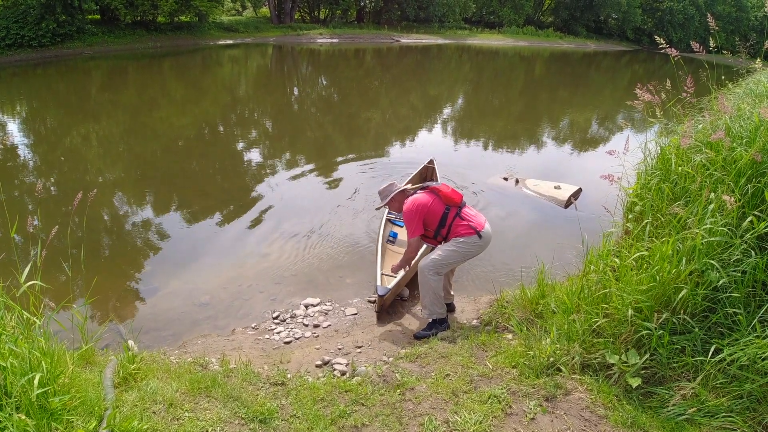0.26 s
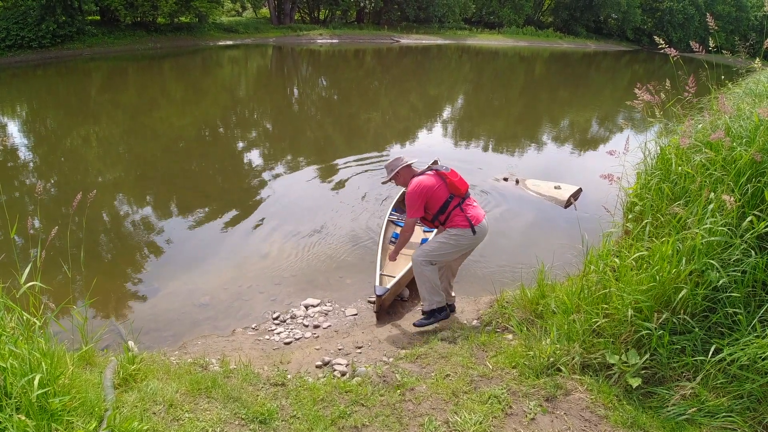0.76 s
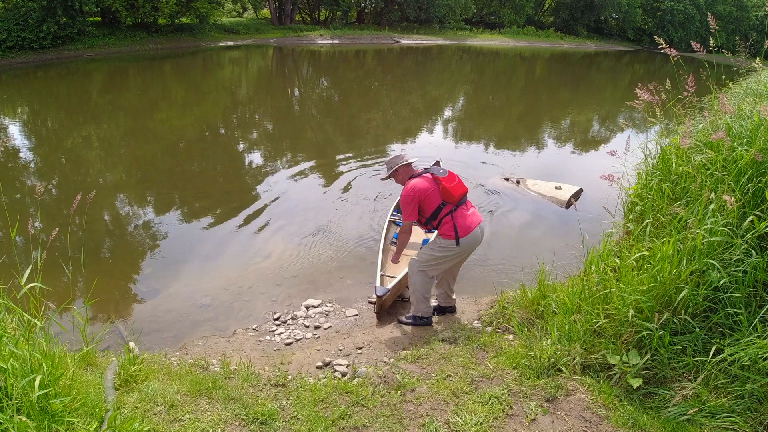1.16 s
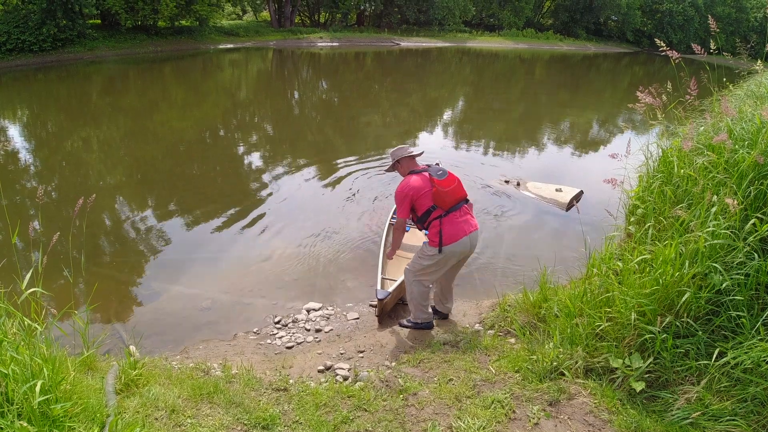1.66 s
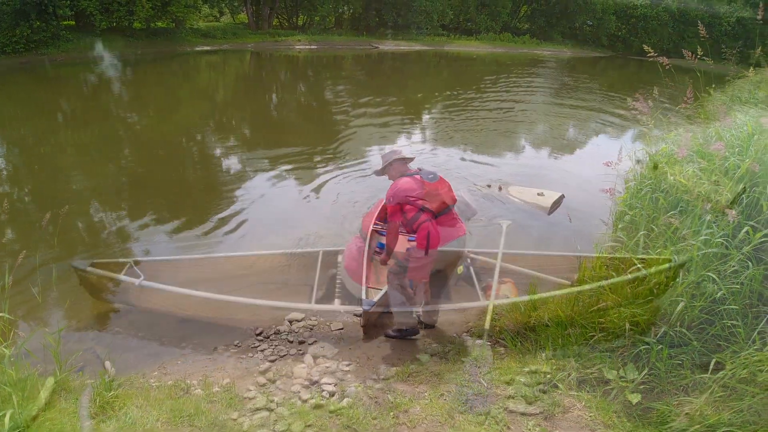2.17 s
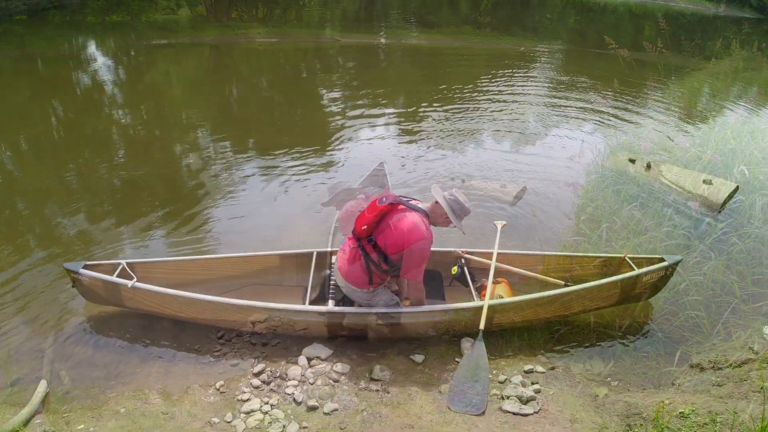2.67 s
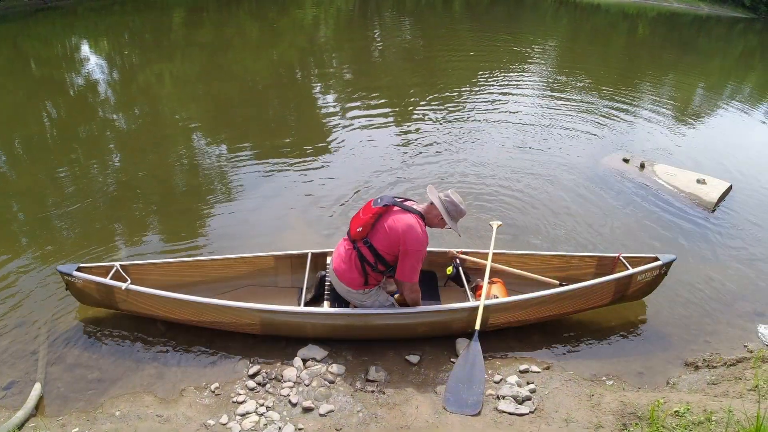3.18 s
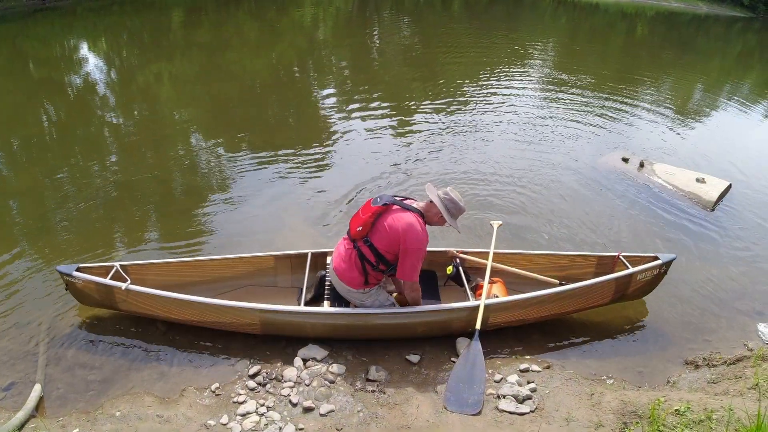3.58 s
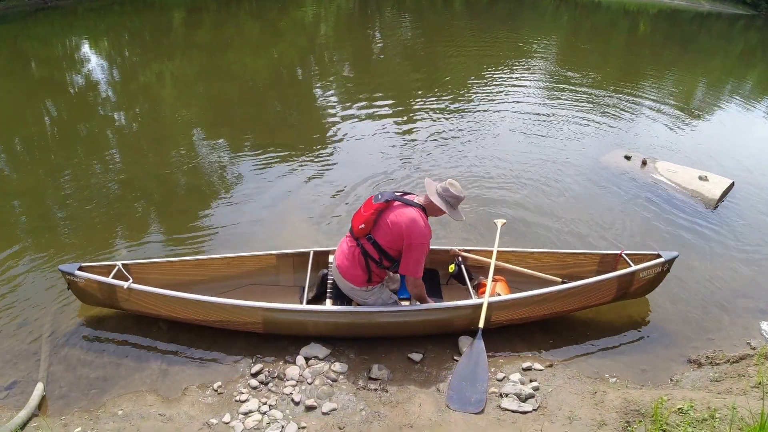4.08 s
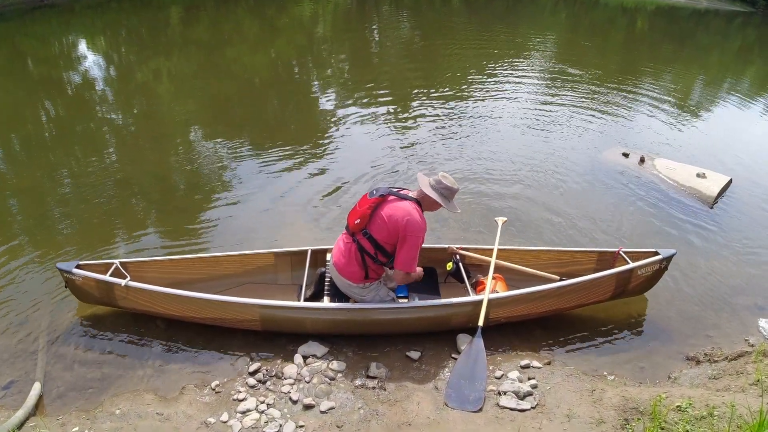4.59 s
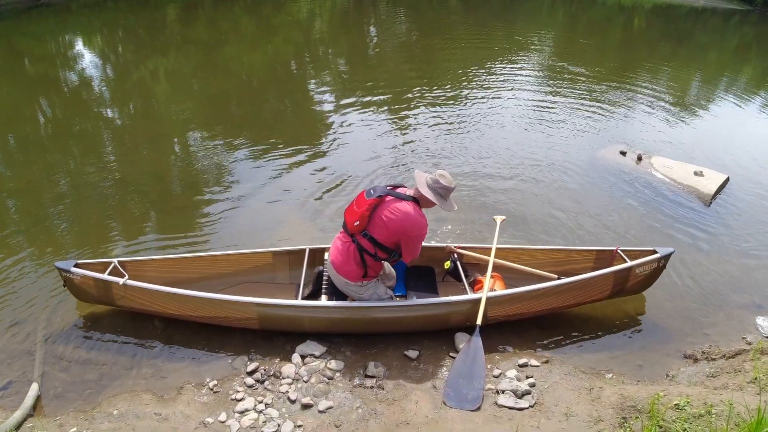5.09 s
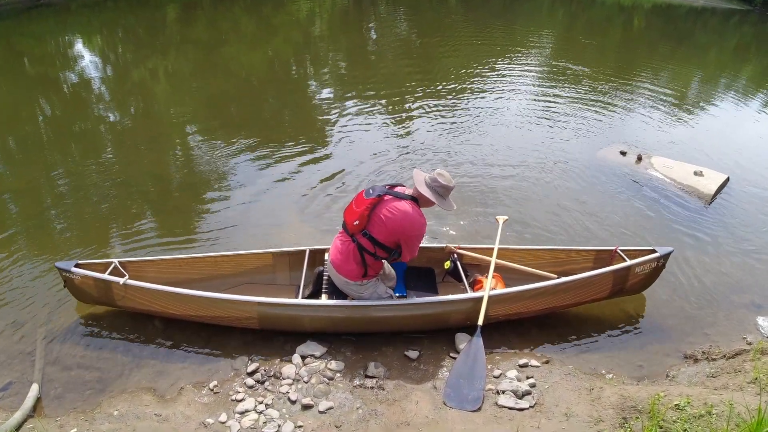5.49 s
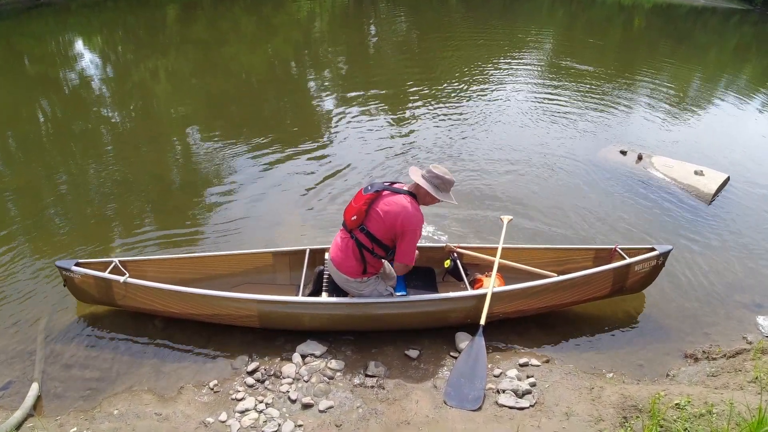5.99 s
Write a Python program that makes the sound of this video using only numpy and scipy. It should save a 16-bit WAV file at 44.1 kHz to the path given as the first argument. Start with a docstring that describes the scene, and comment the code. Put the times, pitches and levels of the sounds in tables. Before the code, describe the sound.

Open-air hush with a faint low engine drone at a riverbank, in wide stereo. A tiny scuff at 0.35 s, then from 0.9 to 2.6 s a far bird warbles short slurred notes, blurred by trees. A light hull knock lands at 1.1 s, a duller thump with a low boom at 1.7 s. Between 1.9 and 3.3 s the background swells into a louder rumbling hush, with soft scuffs and a very faint high hiss. A nearer sparrow whistles at 2.9 and 3.3 s, buzzes at 3.5, rasps from 3.6, then trills six even syllables from 3.9 to 4.6, ending on a sinking whistle. A deep hull boom at 4.2 s. From 4.63 to 4.8 s gear clatters in the hollow canoe, with the heaviest bang about 4.97 s. A buzzy chirp at 5.2 s; watery plops, drips and spray from 5.66 to 5.92 s.

```python
"""A paddler settles into a canoe at a riverbank: noise scuffs, and knocks that ring the hollow hull's modes.
Water plops follow: rising bubble tones with splashes, drips and spray.
A far bird warbles in slurred sines; a nearer sparrow sings whistles, buzzes, a rasp and a trill, with noise-
cloud echoes. Shaped noise gives open-air hush, wavering sines an engine drone; the bank's background fades
into the louder shore's. A separate faint high hiss rises partway through."""
import sys
import numpy as np
from scipy import signal
from scipy.fft import rfft, irfft
from scipy.io import wavfile

SR = 44100
rng = np.random.default_rng(int(sys.argv[2]) if len(sys.argv) > 2 else 0)


def generate_wav(signal):
    """Clip the signal to [-1, 1] and save it as 16-bit WAV at the path in sys.argv[1]."""
    frames = np.transpose(np.atleast_2d(signal))
    scaled = np.clip(frames, -1, 1) * 32767
    pcm = np.round(scaled).astype(np.int16)
    wavfile.write(sys.argv[1], SR, pcm)


N = 275625
TIME = np.arange(N) / SR


def from_db(db):
    """Decibels to gain."""
    return 10 ** (np.asarray(db) / 20)


def rms_one(x):
    """Scale to unit power."""
    return x / np.sqrt(np.mean(x ** 2) + 1e-20)


def at_hz(points, hz):
    """Read a table on a log-frequency axis."""
    f, value = np.transpose(points)
    return np.interp(np.log(hz + 1e-3), np.log(f), value)


def add(out, start_s, sound):
    """Mix a sound in at its start time."""
    i = max(0, int(start_s * SR))
    out[i:i + len(sound)] += sound[:max(0, N - i)]


def bins(x):
    """Frequencies of a sound's spectrum."""
    return np.fft.rfftfreq(x.shape[-1], 1 / SR)


def filtered(x, gain):
    """Apply a gain to each spectral bin."""
    return irfft(rfft(x) * gain, x.shape[-1])


def colour(x, spectrum):
    """Give steady noise a spectrum; rms 1."""
    return rms_one(filtered(x, from_db(at_hz(spectrum, bins(x)))))


def hump(hz, centre_hz, octaves):
    """A bell on the log-frequency axis."""
    return np.exp(-.5 * (np.log2((hz + 1e-3) / centre_hz) / octaves) ** 2)


def cut(x, hz, kind):
    """Fourth-order low- or high-pass."""
    return signal.sosfilt(signal.butter(4, hz, kind, fs=SR, output="sos"), x)


def grains(size, uneven_db):
    """Dense micro-contacts of uneven strength."""
    return rng.standard_normal(size) * from_db(uneven_db * np.minimum(rng.exponential(1, size), 5))


def wander(length, per_s):
    """Random values joined by straight lines, one for each sample."""
    steps = np.arange(length) * per_s / SR
    points = rng.standard_normal(1000)
    return np.interp(steps, np.arange(len(points)), points)


def scatter(x, wet_db, t60_s, delay_s):
    """Reflections off bank and trees: a dying cloud of echoes."""
    t = np.arange(SR) / SR
    cloud = rng.standard_normal(SR) * (t > delay_s) * from_db(-60 * t / t60_s)
    return from_db(wet_db) * signal.fftconvolve(x, cloud / np.linalg.norm(cloud))[:N]


def surround(x, wet_db, t60_s, delay_s):
    """Echoes from all sides: above the bass each ear gets its own."""
    mid, side = scatter(x, wet_db, t60_s, delay_s), scatter(x, wet_db, t60_s, delay_s)
    return (mid + cut(side, 830, "high") * [[1], [-1]]) / np.sqrt(2)


def place(x, phase):
    """Turn the two ears against each other by a bearing's phase."""
    return filtered(x, np.exp(.5j * at_hz(phase, bins(x)) * [[1], [-1]]))


# left-right correlation of the air: (frequency [Hz], correlation [-1..1])
LIKENESS = [(25, 0.79), (70, 1), (300, 0.97), (600, 0.92), (1100, 0.67), (2200, -0.14), (4000, -0.085),
            (8000, 0.6), (14000, 0.66)]


def diffuse(spectrum):
    """Stereo noise from all around, its left-right correlation set by frequency."""
    mid, side = rfft(rng.standard_normal((2, N)))
    alike = np.clip(at_hz(LIKENESS, bins(TIME)), -.99, .995)
    ears = np.sqrt(1 + alike) * mid + np.sqrt(1 - alike) * side * [[1], [-1]]
    return colour(irfft(ears, N), spectrum)


def drone(lines):
    """Low engine lines that waver in strength and phase: sines plus narrow noise skirts."""
    out = 0
    for hz, db, unsteady in lines:
        skirt = rms_one(filtered(rng.standard_normal(N), 1 / (1 + ((bins(TIME) - hz) / 4) ** 2)))
        tone = np.sqrt(2) * np.sin(2 * np.pi * (hz * TIME + rng.random()))
        out = out + from_db(db) * rms_one(tone + unsteady * skirt)
    return out


# hush and hiss spectra: (frequency [Hz], relative density [dB per Hz])
BANK_AIR_SPECTRUM = [(12, -54), (20, -23.5), (43, -6), (127, -10), (156, -12), (227, -16.5), (330, -19.5),
                     (413, -23), (699, -23.5), (812, -24), (1150, -28), (1410, -31), (2320, -33.5),
                     (3220, -34.5), (7920, -58.5), (10300, -61.5), (17400, -120)]
SHORE_AIR_SPECTRUM = [(20, -3), (40, 5), (65, -6), (100, 0), (150, -4.5), (280, -13.5), (500, -19.5),
                      (1000, -19), (2000, -28), (3500, -29.5), (5500, -43.5), (8500, -52.5), (16000, -86)]
HISS_SPECTRUM = [(3000, -3), (9000, -1.5), (13000, 4.5), (16000, -4.5)]
# engine lines: (frequency [Hz], level over the hush [dB], skirt-to-tone ratio [rms])
BANK_DRONE_LINES = [(50.7, -2.5, 0.19), (87.7, -7.5, 1), (130.6, -7, 1)]
SHORE_DRONE_LINES = [(71.4, -5, 0.41), (91.8, -4, 1.24), (272.6, -22, 1.4)]
SHIFT_START_S, SHIFT_END_S = 1.9, 3.29
BANK_HUSH_DB, SHORE_HUSH_DB = -59, -50
HISS_START_DB, HISS_END_DB = -93.5, -84


def air():
    """Open-air hush and engine drone fade from bank to shore; a separate faint high hiss rises."""
    shift = np.clip((TIME - SHIFT_START_S) / (SHIFT_END_S - SHIFT_START_S), 0, 1)
    bank = from_db(BANK_HUSH_DB) * (diffuse(BANK_AIR_SPECTRUM) + drone(BANK_DRONE_LINES))
    shore = from_db(SHORE_HUSH_DB) * (diffuse(SHORE_AIR_SPECTRUM) + drone(SHORE_DRONE_LINES))
    hiss_db = HISS_START_DB + (HISS_END_DB - HISS_START_DB) * shift ** 4
    hiss = from_db(hiss_db) * diffuse(HISS_SPECTRUM)
    return np.sqrt(1 - shift) * bank + shift ** 0.79 * shore + hiss


# modes of hull and rails: (frequency [Hz], relative level [dB], t60 [s])
HULL_MODES = [(47.6, -8.5, 0.16), (91, 2.5, 0.37), (179, -8, .15), (222.3, 7, .11), (285.5, 6, .11),
              (341, 0, 0.06), (461.5, 5, .06), (595, 7, .04), (732, 6, 0.082), (850, 3, 0.057),
              (921, 8.5, 0.078), (985, 8.5, .055), (1160, 1, 0.075), (1256, 2, 0.064), (1350, 0.5, 0.055),
              (1540, 6, .05), (1622, 3.5, .05), (1920, 3, .03), (2070, 5, .045), (2223, 6, 0.028),
              (2390, 3, .025), (2620, 2, .025), (2780, -2, .03), (3920, 9, 0.029)]
# shoes and gear rubbing: (peak time [s], swell [s], level [dB], centre [Hz], spread [octaves])
SCUFFS = [(.346, 0.0019, -51.5, 3200, 0.4), (.73, 0.058, -75, 2450, .25), (2.029, .022, -63.5, 1510, 1.3),
          (2.19, 0.015, -58.5, 1840, 1.3), (2.745, 0.0074, -55, 2490, 0.4), (2.85, .022, -54, 1830, 1.36),
          (3.406, .011, -46, 1820, 0.97), (3.682, .012, -46.5, 1910, 1), (5.043, 0.0058, -59, 3700, 0.49),
          (5.609, 0.0021, -54.5, 2450, .5)]


def scuffs(grit_db, panel_db):
    """Short rubs: grit swells and fades, coloured by the hull's panels."""
    out, t = np.zeros(N), np.arange(SR // 4) / SR
    f = bins(t)
    panels = sum(1 / (1 + ((f - hz) / 45) ** 2) for hz, _, _ in HULL_MODES)
    for peak_s, swell_s, db, centre_hz, octaves in SCUFFS:
        tone = hump(f, centre_hz, octaves) * from_db(panel_db * panels) / np.sqrt(f + centre_hz)
        grit = rms_one(filtered(grains(len(t), grit_db), tone))
        catch_db = 2.5 * wander(len(t), per_s=170)
        swell = 1 / np.cosh((t - t.mean()) / swell_s)
        add(out, peak_s - t.mean(), from_db(db + catch_db) * grit * swell)
    return out


def note(length_s, db, pitches_hz, depth_hz=0, buzz_per_s=0, edge_s=.025, waver=0.0021, throb=0.76,
         roughness=0.89):
    """One sine gliding through its pitches; a buzz swings roughly in pitch and pulses in level."""
    u = np.linspace(0, 1, max(8, int(length_s * SR)))
    knots = np.linspace(0, 1, len(pitches_hz))
    glide_hz = np.polyval(np.polyfit(knots, pitches_hz, len(pitches_hz) - 1), u)
    unsteady = wander(len(u), per_s=270)
    cycle = 2 * np.pi * np.cumsum(buzz_per_s * (1 + .1 * unsteady)) / SR
    swing = roughness * wander(len(u), per_s=720) - np.sin(cycle)
    hz = glide_hz * (1 + waver * unsteady) + depth_hz * swing
    edges = signal.windows.tukey(len(u), min(2 * edge_s / length_s, .85))
    level = edges * (1 - min(throb, 1) * np.sin(cycle / 2) ** 2)
    return np.sqrt(2) * from_db(db) * level * np.sin(2 * np.pi * np.cumsum(hz) / SR)


# slurred notes: (time [s], length [s], level [dB], start [Hz], middle [Hz], end [Hz])
WARBLE_NOTES = [(.873, 0.031, -59.5, 4700, 4200, 3680), (.905, 0.048, -67.5, 2390, 2550, 2870),
                (1.023, 0.047, -55, 3020, 3070, 3120), (1.266, 0.051, -57, 4670, 4200, 3820),
                (1.312, 0.052, -61, 3830, 3750, 3650), (1.32, .04, -54, 3280, 3050, 2820),
                (1.408, 0.031, -56.5, 3340, 3150, 3400), (1.445, 0.038, -55.5, 3710, 3550, 3450),
                (1.477, 0.052, -56, 3330, 3450, 3380), (1.531, 0.043, -58, 2950, 2900, 2690),
                (1.572, .046, -51, 3080, 3030, 2800), (1.59, .055, -57, 2530, 2460, 2510),
                (1.636, .062, -55.5, 2800, 2780, 2920), (1.656, .032, -58.5, 4910, 4450, 4000),
                (1.743, 0.054, -50, 2840, 2780, 2790), (1.783, 0.037, -49, 3000, 3170, 3100),
                (1.818, .046, -53.5, 2980, 2940, 3080), (1.88, .036, -56, 2840, 2750, 2500),
                (1.916, .05, -60.5, 2350, 2380, 2640), (1.96, 0.037, -49, 2720, 2800, 2780),
                (2.059, 0.0423, -61.5, 4700, 4400, 3900), (2.09, 0.069, -54, 3600, 3090, 3500),
                (2.16, 0.057, -56, 3490, 3400, 3500), (2.238, 0.053, -56.5, 3230, 2880, 2710),
                (2.285, 0.066, -62, 2700, 2380, 2340), (2.35, .03, -56.5, 2380, 2500, 2520),
                (2.367, .034, -52, 3060, 2880, 2840), (2.403, .04, -49, 2910, 2880, 2930),
                (2.462, .058, -58, 2206, 2420, 2470), (2.521, 0.038, -53.5, 2470, 2520, 2640),
                (2.548, 0.038, -48.5, 2630, 2660, 2540)]
# phase by which the left ear leads: (frequency [Hz], phase [rad])
WARBLER_PHASE = [(2600, 1.18), (3400, 1.96), (4200, 2.1)]
WARBLE_CLEAR_HZ, WARBLE_BUZZ_PER_S = 2993, 89
WARBLE_DEPTH_HZ_PER_HZ = 0.16   # swing per Hz of middle pitch above clear


def warbler():
    """The far song: short slurred notes, blurred by the trees; low ones are clear, high ones buzz."""
    song = np.zeros(N)
    for s, length_s, db, *pitches_hz in WARBLE_NOTES:
        depth_hz = WARBLE_DEPTH_HZ_PER_HZ * max(pitches_hz[1] - WARBLE_CLEAR_HZ, 0)
        add(song, s, note(length_s, db, pitches_hz, depth_hz, WARBLE_BUZZ_PER_S,
                          edge_s=.012, waver=.012, throb=0.25))
    blurred = from_db(-2.5) * song + scatter(song, wet_db=-6, t60_s=.18, delay_s=.004)
    return place(blurred, WARBLER_PHASE) + surround(song, wet_db=-8.5, t60_s=.7, delay_s=.014)


def hull_rings():
    """The free ringing of each hull mode, one row a mode."""
    t = np.arange(SR // 3) / SR
    hz, mode_db, t60_s = np.transpose(HULL_MODES)[:, :, None]
    return from_db(mode_db - 60 * t / t60_s) * np.sin(2 * np.pi * hz * t)


RATTLES_PER_S = 2200


def blow(rings, centre_hz, octaves, rattle_s, rattle_db=7.0, crack_db=-3, crack_t60_s=0.04, hard_hz=685):
    """A blow and its rattle ring the hull; contact hardness picks which modes answer. Peak 1."""
    t, mode_hz = np.arange(rings.shape[1]) / SR, np.array(HULL_MODES)[:, 0]
    # soft blows thump, hard ones crack and chatter
    hard = centre_hz / (centre_hz + hard_hz)
    body = (hump(mode_hz, centre_hz, octaves) * rng.choice([-1, 1], len(mode_hz))) @ rings
    # the many damped panel modes merge into a short crack
    f = bins(t)
    crack = filtered(rng.standard_normal(len(t)), hump(f, centre_hz, octaves) / np.sqrt(f + centre_hz))
    crack *= from_db(-60 * t / crack_t60_s) * (1 - np.exp(-2 * t * centre_hz))
    hits = rng.random(len(t)) < RATTLES_PER_S / SR
    force = grains(len(t), uneven_db=3.0) * hits * np.exp(-t / rattle_s)
    force *= hard * from_db(rattle_db) / np.linalg.norm(force)
    force[0] += 1   # the blow itself
    response = rms_one(body) + hard * from_db(crack_db) * rms_one(crack)
    sound = signal.fftconvolve(force, response)[:len(t)]
    # the time of contact limits how high a blow reaches
    sound = cut(sound, min(centre_hz * 2 ** (2 * octaves), SR / 4), "low")
    return sound / np.abs(sound).max()


# gear landing, a clack then the thump of its weight: (time [s], clack level [dB], clack centre [Hz],
# clack spread [octaves], thump level [dB], thump centre [Hz], rattle decay [s])
KNOCKS = [(1.098, -42, 1080, .3, -51.5, 160, .0011), (1.727, -41, 570, .2, -39.5, 200, .00038),
          (4.627, -40, 1200, .8, -44.5, 200, 0.00069), (4.631, -38.5, 1200, 0.88, -43, 200, .001),
          (4.646, -45, 2050, 0.26, -36, 223, .002), (4.659, -49, 900, 0.74, -40, 330, .002),
          (4.674, -40, 1800, 0.76, -40, 190, .002), (4.684, -38.5, 3900, .3, -45, 420, 0.0022),
          (4.698, -33.5, 1450, 0.65, -43, 400, 0.00064), (4.703, -34.5, 1300, 0.75, -43, 450, 0.00067),
          (4.708, -32.5, 2000, .45, -38.5, 300, .0008), (4.716, -37.5, 1050, 0.72, -40, 230, .001),
          (4.738, -43.5, 1600, 0.93, -41.5, 200, 0.0023), (4.75, -50, 2500, .5, -40.5, 100, .002),
          (4.778, -44.5, 610, 0.19, -42.5, 110, .012), (4.795, -50.5, 2600, .9, -49, 200, .001),
          (4.964, -30, 1040, 0.59, -37, 260, 0.0043), (4.971, -29, 930, 0.57, -38, 300, .002),
          (4.978, -34.5, 850, 0.52, -29, 275, .002), (4.989, -38, 950, 0.47, -39, 280, .003),
          (5.049, -39.5, 1000, .28, -46, 250, .002), (5.058, -43.5, 1150, .25, -48, 420, 0.0026),
          (5.069, -49, 950, 0.36, -45, 270, .003)]
THUMP_OCTAVES, THUMP_LAG_S = 0.45, 0.00401
# shifting weight flexes the whole hull: (time [s], peak level [dB], centre [Hz])
BOOMS = [(1.736, -39, 52), (2.729, -47, 43), (4.197, -34.5, 58.2), (4.983, -34.5, 90)]
BOOM_OCTAVES, BOOM_RATTLE_S = 0.34, 0.0032


def hull():
    """Gear clacks and thumps on the hull, which booms as the weight in it shifts."""
    out, rings = np.zeros(N), hull_rings()
    for s, clack_db, clack_hz, octaves, thump_db, thump_hz, rattle_s in KNOCKS:
        clack = blow(rings, clack_hz, octaves, rattle_s)
        thump = blow(rings, thump_hz, THUMP_OCTAVES, rattle_s)
        add(out, s, from_db(clack_db) * clack)
        add(out, s + THUMP_LAG_S, from_db(thump_db) * thump)
    for s, db, hz in BOOMS:
        add(out, s, from_db(db) * blow(rings, hz, BOOM_OCTAVES, BOOM_RATTLE_S))
    return out


# calls from deep in the trees: (time [s], length [s], level [dB], start [Hz], end [Hz])
CHIRPS = [(1.159, 0.0534, -49, 2706, 2970), (5.226, 0.059, -44.5, 2945, 2825)]
CHIRP_BUZZ_PER_S, CHIRP_SWING_HZ = 133, 203
# phase by which the left ear leads, chirps and sparrow: (frequency [Hz], phase [rad])
SPARROW_PHASE = [(2450, 3.8), (2850, 3.7), (3280, 2.53), (3700, 2.2), (4700, .87), (5450, .34),
                 (6700, -.14)]


def chirps():
    """Short, single buzzy calls with strong echoes."""
    out = np.zeros(N)
    for s, length_s, db, start_hz, end_hz in CHIRPS:
        add(out, s, note(length_s, db, [start_hz, end_hz], CHIRP_SWING_HZ, CHIRP_BUZZ_PER_S))
    return place(out, SPARROW_PHASE) + surround(out, wet_db=-6.5, t60_s=0.15, delay_s=0.0022)


def sparrow(echo_s, echo_db):
    """The near song, with a quick echo off the bank and a wash from the trees."""
    song = sparrow_song()
    # mostly the short wavelengths bounce off grass and leaves
    bright = cut(song, 3800, "high")
    echo = from_db(echo_db) * np.interp(TIME - echo_s, TIME, bright)
    near = song + echo + scatter(bright, wet_db=-8, t60_s=0.1, delay_s=0.0033)
    band = cut(cut(bright, 4240, "high"), 5800, "low")
    long_wash = surround(band, wet_db=-18, t60_s=0.75, delay_s=0.038)
    short_wash = surround(song, wet_db=-21.5, t60_s=0.34, delay_s=0.02)
    return place(near, SPARROW_PHASE) + long_wash + short_wash


LONE_FLICK_S, LONE_FLICK_DB = 3.555, -36


def sparrow_song():
    """Buzzes, whistles, a lone flick, the rasp, the trill and the closing note."""
    out = buzzes() + whistles() + rasp(count=12) + trill(count=6) + closing_note(count=10)
    add(out, LONE_FLICK_S, flick(LONE_FLICK_DB))
    return out


# (time [s], length [s], level [dB], start [Hz], end [Hz], buzz rate [1/s], swing [share of end pitch])
BUZZES = [(2.312, 0.07, -71, 5770, 5200, 220, 0.087), (2.311, 0.1, -79.5, 7870, 8300, 200, .06),
          (2.872, .025, -61, 4420, 4400, 150, .03), (3.08, .05, -69.5, 4650, 4630, 150, 0.028),
          (3.264, 0.0246, -58.5, 4450, 4280, 150, 0.037), (3.461, 0.075, -53.5, 7910, 7310, 173, 0.022),
          (3.478, 0.058, -40, 6880, 6590, 162, 0.041), (3.5, .05, -54, 5950, 5600, 162, .035),
          (3.545, .014, -48, 5250, 5350, 57, .005), (3.61, .016, -47, 3570, 3550, 57, .015),
          (3.66, 0.065, -43, 3680, 3667, 59, .004), (4.89, 0.0294, -52, 4920, 4490, 180, 0.065)]


def buzzes():
    """Notes whose pitch swings and level pulses at the buzz rate."""
    out = np.zeros(N)
    for s, length_s, db, start_hz, end_hz, buzz_per_s, swing in BUZZES:
        add(out, s, note(length_s, db, [start_hz, end_hz], swing * end_hz, buzz_per_s))
    return out


# (time [s], length [s], level [dB])
WHISTLES = [(2.885, 0.12, -40), (3.123, .14, -68), (3.274, .135, -36.5), (3.53, .1, -56.5)]
WHISTLE_HZ, WHISTLE_HOLD_S, WHISTLE_FADE_DB_PER_S = 3278, 0.059, 290.5


def whistles():
    """Near-steady tones: quick attack, short hold, even fade."""
    out = np.zeros(N)
    for s, length_s, db in WHISTLES:
        tone = note(length_s, db, [WHISTLE_HZ], edge_s=.016, waver=0.0024)
        faded_s = np.maximum(np.arange(len(tone)) / SR - WHISTLE_HOLD_S, 0)
        add(out, s, tone * from_db(-WHISTLE_FADE_DB_PER_S * faded_s))
    return out


FLICK_HZ, FLICK_S = (5500, 4770, 3750), 0.013   # (start, middle, end)


def flick(db):
    """A quick downward sweep, heard alone and in the trill."""
    return note(FLICK_S, db, FLICK_HZ)


RASP_START_S, RASP_PERIOD_S, RASP_PULSE_S = 3.627, .018, .014
RASP_DB, RASP_HZ = -47, 3620
RASP_PIP_DB, RASP_PIP_HZ = -17, 4930   # level re pulse


def rasp(count):
    """A run of harsh pulses, each with a faint high pip, smeared into a haze by the leaves."""
    out = np.zeros(N)
    starts_s = RASP_START_S + RASP_PERIOD_S * np.arange(count)
    levels_db = RASP_DB + rng.normal(0, 1.5, count)
    for s, db in zip(starts_s, levels_db):
        add(out, s, note(RASP_PULSE_S, db, [RASP_HZ], depth_hz=258, buzz_per_s=303,
                         edge_s=0.0037, throb=0.33))
        add(out, s, note(RASP_PULSE_S, db + RASP_PIP_DB, [RASP_PIP_HZ], depth_hz=110, buzz_per_s=270))
    return out + scatter(out, wet_db=-4.5, t60_s=.08, delay_s=0.0019)


# soft notes around each trill flick: (time after flick [s], length [s], level [dB],
# start [Hz], middle [Hz], end [Hz], buzz depth [Hz])
SYLLABLE = [(-.024, 0.055, -64, 7330, 7560, 7460, 28), (-.010, 0.013, -56, 5030, 5300, 5380, 10),
            (0.021, 0.06, -48, 2800, 2440, 2750, 75), (0.064, 0.077, -61, 2800, 2770, 2740, 98)]
TRILL_START_S, TRILL_PERIOD_S, TRILL_DB = 3.9184, .1227, -39.5


def trill(count):
    """One syllable repeated evenly: thin high notes, the flick, a low dip and a softer low tail."""
    out = np.zeros(N)
    for s in TRILL_START_S + TRILL_PERIOD_S * np.arange(count):
        add(out, s, flick(TRILL_DB))
        for after_s, length_s, db, *pitches_hz, depth_hz in SYLLABLE:
            add(out, s + after_s, note(length_s, db, pitches_hz, depth_hz, buzz_per_s=98.5, throb=0.28))
    return out


CLOSE_START_S, CLOSE_S, CLOSE_DB, CLOSE_HZ = 4.642, .22, -43, (5490, 5400, 5300)
CLOSE_FADE_DB_PER_S = 27
CLOSE_FLICK_AFTER_S, CLOSE_FLICK_PERIOD_S = .016, .0214
CLOSE_FLICK_S, CLOSE_FLICK_DB, CLOSE_FLICK_HZ = 0.0068, -44, (5480, 4840, 4100)


def closing_note(count):
    """A sinking, fading whistle with a fast run of downward flicks hanging from it."""
    out = np.zeros(N)
    add(out, CLOSE_START_S, note(CLOSE_S, CLOSE_DB, CLOSE_HZ, depth_hz=45,
                                 buzz_per_s=1 / CLOSE_FLICK_PERIOD_S, throb=0.3))
    for s in CLOSE_START_S + CLOSE_FLICK_AFTER_S + CLOSE_FLICK_PERIOD_S * np.arange(count):
        add(out, s, note(CLOSE_FLICK_S, CLOSE_FLICK_DB, CLOSE_FLICK_HZ))
    return out * from_db(-CLOSE_FADE_DB_PER_S * np.maximum(TIME - CLOSE_START_S, 0))


# water landing beside the boat: (time [s], level [dB], starting bubble pitch [Hz])
PLOPS = [(5.664, -48.5, 784), (5.673, -36.5, 840), (5.682, -46.5, 2060), (5.693, -46, 788),
         (5.724, -51, 1970), (5.741, -53, 1940), (5.756, -47.5, 854), (5.772, -51, 3300),
         (5.819, -51, 2150), (5.838, -47.5, 2116), (5.889, -54, 3210), (5.913, -44, 798), (5.922, -44, 787)]
PLOP_SWELL_S, PLOP_SWELL_HZ = .0058, 825   # swell time at this pitch; smaller bubbles are quicker
DRIP_DB, DRIP_LOW_HZ, DRIP_HIGH_HZ = -59, 898, 3400
# spray spectrum: (frequency [Hz], relative level [dB])
SPRAY_SPECTRUM = [(300, 8.5), (850, 5), (1150, -2), (1700, -4.5), (2100, 0.5), (2500, -11), (3300, -5),
                  (4500, -17.5), (9000, -36), (16000, -56)]
SPRAY_START_S, SPRAY_END_S, SPRAY_DROPS_PER_S = 5.68, 5.85, 2500
SPRAY_DB, SPRAY_RISE_DB_PER_S, SPRAY_FALL_DB_PER_S = -55, 162, 51


def water(rise_per_s, fizz_db, splash_db, splash_octaves, drip_count):
    """Plops and drips: a splash and a trapped bubble that swells and rises in pitch; spray patters."""
    out, t = np.zeros(N), np.arange(SR // 8) / SR
    drips = []
    for k, (when, small) in enumerate(rng.random((drip_count, 2))):
        drip_s = SPRAY_START_S + (SPRAY_END_S - SPRAY_START_S) * (k + when) / (drip_count - 1)
        drips.append((drip_s, DRIP_DB, DRIP_LOW_HZ * (DRIP_HIGH_HZ / DRIP_LOW_HZ) ** small))
    for s, db, hz in PLOPS + drips:
        swell_s = PLOP_SWELL_S * np.sqrt(PLOP_SWELL_HZ / hz)
        swell = (t / swell_s * np.exp(1 - t / swell_s)) ** 2
        ring = np.sin(2 * np.pi * hz * t * (1 + rise_per_s * t))
        splash = rms_one(filtered(grains(len(t), 6.1), hump(bins(t), hz, splash_octaves)))
        add(out, s, from_db(db) * swell * (ring + from_db(splash_db) * splash))
    drops = grains(N, fizz_db) * (rng.random(N) < SPRAY_DROPS_PER_S / SR)
    before_s = np.maximum(SPRAY_START_S - TIME, 0)
    after_s = np.maximum(TIME - SPRAY_END_S, 0)
    spray_db = SPRAY_DB - SPRAY_RISE_DB_PER_S * before_s - SPRAY_FALL_DB_PER_S * after_s
    return out + from_db(spray_db) * colour(drops, SPRAY_SPECTRUM)


def scene():
    """The boat lies straight ahead, the birds off to the side."""
    gear = hull() + scuffs(grit_db=5.0, panel_db=4.0)
    plops = water(rise_per_s=0.93, fizz_db=0.5, splash_db=-8.5, splash_octaves=0.39, drip_count=40)
    boat = cut(gear, 3970, "low") + plops
    # short waves bounce about inside the open hull; the trees answer later
    inside = surround(cut(boat, 360, "high"), wet_db=-7, t60_s=0.09, delay_s=0.0082)
    trees = surround(boat, wet_db=-16.0, t60_s=0.24, delay_s=0.064)
    birds = sparrow(echo_s=0.013, echo_db=-11.5) + warbler() + chirps()
    return boat + inside + trees + birds + air()


EDGE_FADE_S, CUTOFF_HZ = .004, 15700


def record(dry):
    """The ends are eased and the top is cut steeply."""
    ease = np.minimum(np.minimum(TIME, TIME[::-1]) / EDGE_FADE_S, 1)
    top_cut = signal.ellip(10, .1, 80, CUTOFF_HZ, fs=SR, output="sos")
    return signal.sosfilt(top_cut, dry * ease)


dry = scene()
out = record(dry)
generate_wav(out)
```